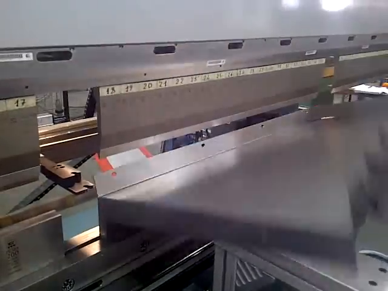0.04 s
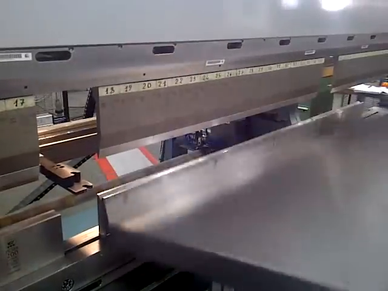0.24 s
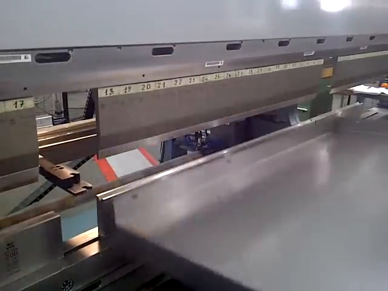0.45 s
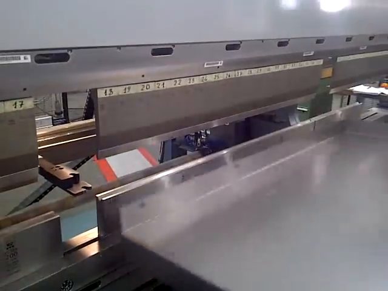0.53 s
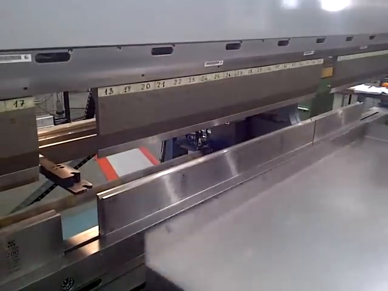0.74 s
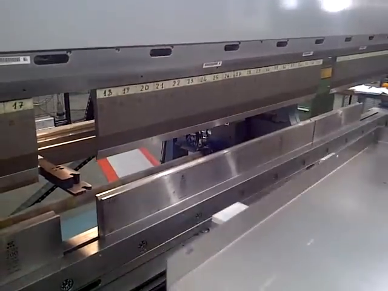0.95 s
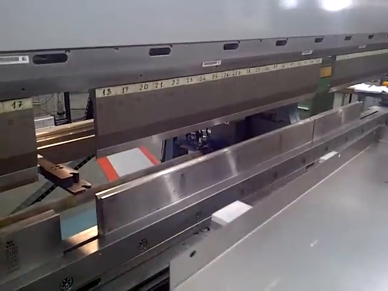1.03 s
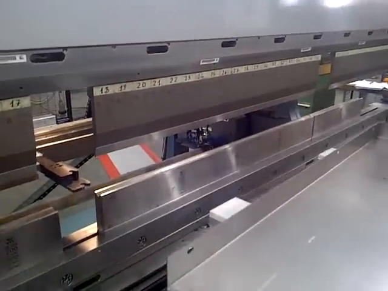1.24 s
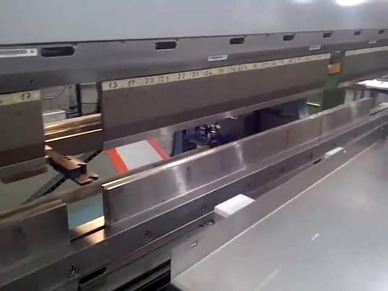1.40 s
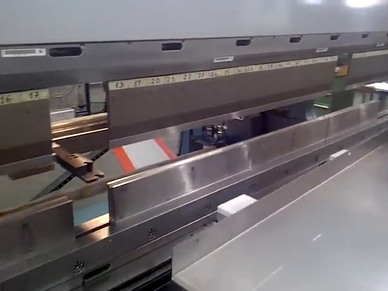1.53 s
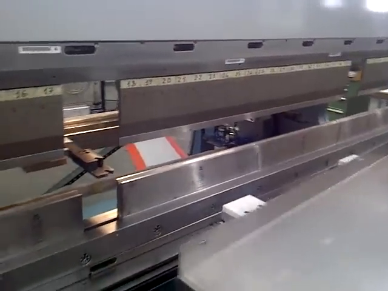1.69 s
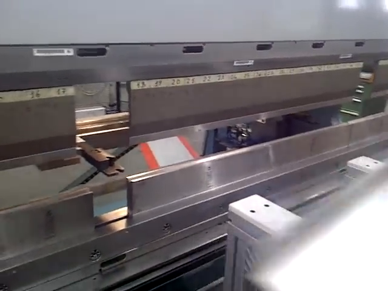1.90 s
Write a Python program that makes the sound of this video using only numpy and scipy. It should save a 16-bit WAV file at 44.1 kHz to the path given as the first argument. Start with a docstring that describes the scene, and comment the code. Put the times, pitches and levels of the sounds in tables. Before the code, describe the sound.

Loud ringing clanks and a short scrape of sheet metal, with machines humming behind.

```python
"""Steel sheet on a press brake

Close by, in a workshop hall, a bent steel sheet is slid onto the bed of a press brake: it touches,
drops twice with a clank, scrapes on and rattles against the stops, where pressing it damps the ring.
Machines hum behind it. The recorder's gain control ducks at the first heavy knock and slowly recovers."""
import sys
import numpy as np
from scipy import signal
from scipy.fft import irfft, next_fast_len
from scipy.io import wavfile
from scipy.ndimage import uniform_filter1d, minimum_filter1d

SR = 44100
rng = np.random.default_rng(int(sys.argv[2]) if len(sys.argv) > 2 else 0)


def unload_audio(sound):
    """Save the sound as a 16-bit wav file, at the path given as the first command line argument."""
    columns = np.transpose(np.atleast_2d(sound))
    # keep every value between -1 and 1, then stretch to whole-number steps
    steps = np.round(np.clip(columns, -1, 1) * 32767)
    wavfile.write(sys.argv[1], SR, steps.astype(np.int16))


N = 85995
T = np.arange(N) / SR
SIZE = next_fast_len(N)
FREQ = np.maximum(np.arange(SIZE // 2 + 1) * SR / SIZE, 1)
MIC_TOP_HZ = 8705


def undb(db):
    """Decibels to gain."""
    return 10 ** (np.asarray(db) / 20)


def unit(x):
    """Scale to rms 1."""
    return x / np.sqrt(np.mean(x ** 2))


def noise(gain):
    """Random-phase sound of rms 1 with the given gain at each frequency."""
    return unit(irfft(gain * np.exp(2j * np.pi * rng.random(len(FREQ))), SIZE)[:N])


def colour(points):
    """Gain at each frequency from (freq_hz, level_db) points."""
    hz, db = np.array(points).T
    return undb(np.interp(np.log(FREQ), np.log(hz), db))


def bell(hz, octaves):
    """A smooth band round one frequency."""
    return np.exp(-.5 * (np.log2(FREQ / hz) / octaves) ** 2)


def wander(rate_hz):
    """Smooth random drift of rms 1."""
    return noise(np.exp(-(FREQ / rate_hz) ** 2))


def strike(start, rise, hold, t60):
    """Linear attack, hold and exponential decay, all in seconds."""
    decay_s = np.maximum(T - start - rise - hold, 0)
    return np.clip((T - start) / rise, 0, 1) * undb(-60 * decay_s / t60)


def curve(points):
    """Gain over time from (time_s, level_db) points."""
    return undb(np.interp(T, *np.array(points).T))


def weak_modes(count=600, gap_hz=19):
    """The sheet's unevenly spaced weak modes, as a comb over frequency."""
    offset, strength = rng.random((count, 2)).T
    hz = (np.arange(count) + offset) * gap_hz
    comb = np.zeros(len(FREQ))
    comb[np.searchsorted(FREQ, hz)] = .5 + strength
    return comb


def workshop():
    """Fans and motors in the background: broad noise with a few wavering hum lines."""
    # spectrum of the hall's noise: freq_hz, relative_db
    spectrum = [(25, -28), (60, -16), (140, -7), (280, -1.5), (480, -2), (750, 0), (1000, -2), (1450, -0.6),
                (2200, -8), (3600, -16.5), (5200, -17.5), (6100, -17.5), (7200, -19), (9000, -23.5)]
    # machine hum lines: pitch_hz, level_db
    lines = [(48, -71.5), (94, -63.5), (299, -54), (1197, -53.5)]
    hum = sum(undb(db) * np.sqrt(2) * np.sin(2 * np.pi * hz * T + .49 * wander(2.5)) for hz, db in lines)
    return undb(-37 + 1.4 * wander(8.3)) * noise(colour(spectrum)) + hum


def scrape(comb):
    """Uneven friction on the bed drives the sheet's modes; the edge sings as it nears the stops."""
    # strength of the scrape: time_s, level_db
    slide = [(0, -33), (.06, -32), (.13, -43.5), (.2, -42), (.4, -35.5), (.47, -24), (.6, -30), (.7, -21),
             (.79, -23.5), (.86, -29.5), (.95, -51.5), (1.15, -75)]
    # spectrum of the scrape: freq_hz, relative_db
    spectrum = [(25, -32.5), (70, -11.5), (130, -19.5), (300, 3.5), (680, 0.5), (1000, -5.5), (1350, -3),
                (1850, -13.5), (2300, -26), (6500, -36), (9000, -37)]
    # swell of the singing edge: time_s, level_db
    swell = [(.62, -55), (.72, -36), (.79, -25.5), (.86, -20), (.92, -55), (1.0, -90)]
    body = unit(.66 * noise(colour(spectrum) * comb) + noise(colour(spectrum)))
    singing = curve(swell) * noise(bell(1830, octaves=.05))
    grain = undb(3.5 * wander(90))
    return (curve(slide) * body + singing) * grain


def bumps():
    """The held sheet flexes with soft, low bumps."""
    # flexes of the sheet: start_s, centre_hz, level_db
    flexes = [(0.0, 260, -35), (0.164, 89.5, -51.5), (.345, 75, -35.5), (.43, 135, -28),
              (0.836, 110, -32.5), (0.872, 325, -24), (1.57, 280, -41), (1.622, 277, -39),
              (1.695, 337, -44)]
    return sum(undb(db) * noise(bell(hz, octaves=.23)) * strike(start, rise=.006, hold=.014, t60=.17)
               for start, hz, db in flexes)


def ticks():
    """The edge touches the die with light, bright ticks."""
    # touches on the die: start_s, level_db
    touches = [(0.0214, -45.5), (0.596, -31.5), (0.644, -36), (0.6872, -26.5), (0.752, -32), (0.782, -39)]
    return sum(undb(db) * noise(bell(6100, octaves=.7)) * strike(start, rise=.002, hold=0, t60=.13)
               for start, db in touches)


def glide():
    """The edge hisses as it glides in before the first knock."""
    # swell of the hiss: time_s, level_db
    swell = [(.12, -69.5), (.17, -47), (.22, -41), (.25, -54.5)]
    end_s = swell[-1][0]
    return curve(swell) * noise(bell(5200, octaves=.55)) * (T < end_s)


def knocks(comb, pressed_s=.77, damping_db_per_s=90):
    """Each knock chatters into a short clank and leaves the sheet ringing until it is pressed home."""
    # blows on the sheet: start_s, place, clank_db, ring_db, bass_db, treble_db, rise_s, chatter_s
    blows = [(0.226, "edge", -24, -16.5, -16.5, 2.5, 0.0065, .018),
             (0.3347, "edge", -1, -3.5, 0, -5, 0.0021, 0.0055),
             (0.348, "edge", -7.5, -12.5, 10, 4.5, .002, .012),
             (0.366, "edge", -16.5, -16, -5.5, 13.5, .001, .003),
             (0.389, "edge", -17, -7, 3, -13, .002, .005),
             (0.496, "face", -2.5, -5.5, 0.5, 2.5, 0.0011, 0.0033),
             (0.526, "face", -18, -21, -7, -17, 0.00088, .007),
             (0.796, "flange", -10.5, -9.5, -4.5, 3, 0.0044, .012),
             (0.814, "flange", -9, -14, -15.5, 2.5, 0.003, .014),
             (0.8433, "flange", -13, -15, -3, 3, 0.0029, 0.01)]
    # crowded plate modes by band: centre_hz, clank_db, clank_t60_s, ring_db, free_ring_t60_s
    plate = [(70, -29.5, .2, -45, .8), (188.7, -14.5, 0.067, -26.5, 0.82), (394, -9, 0.12, -23, 1),
             (670, -4, 0.15, -15.5, 1), (1463, -6.5, .09, -13.5, 1), (2846, -19, 0.21, -19.5, .55),
             (4920, -16.5, .11, -26.5, 0.21), (6880, -14.5, 0.075, -37, 0.14)]
    # strong modes and their response by place struck: pitch_hz, free_t60_s, edge_db, face_db, flange_db
    modes = [(211, 0.19, -17, -22, -20.5), (275.7, 0.42, -25.5, -31.5, -5.5),
             (327.4, 0.93, -17.5, -6, -6.5), (365, 0.32, -11, -27.5, -17.5), (437.6, 1.1, -10.5, -10, -9),
             (587, 0.62, -6.5, -23.5, -27), (660.3, 0.42, -3.5, -19.5, -25), (705, 1.1, -16, -11.5, -7),
             (716.4, 0.59, -15, -8, -24), (775.4, 0.71, -29.5, -11, -8.5), (796, 0.25, -8, -12.5, -1.5),
             (927, 0.56, -13, -26.5, -2), (944, 1.1, -15, -19.5, -14.5), (1182, .85, -20.5, -22.5, -12.5),
             (1199, 1.7, -22.5, -12, -30), (1225, 0.73, -15.5, -21, -12), (1276, 0.97, -11.5, -18.5, -29),
             (1327, .5, -21, -19, -10), (1418, 0.31, -12, -11, -22), (1481, 0.55, -35, -13.5, -22),
             (1528, 0.51, -32.5, -18.5, -13.5), (1731, 1.3, -23.5, -19, -16.5),
             (1852, .6, -31, -20.5, -13.5), (1950, 0.23, -24, -29.5, -5.5), (2570, 0.68, -25, -21, -29),
             (2696, .4, -29.5, -26, -36), (2747, .45, -23, -18, -35), (2920, .5, -34.5, -17.5, -39),
             (3275, 0.27, -33.5, -17, -15), (4600, 0.29, -26.5, -39, -32), (4810, 0.44, -23, -39.5, -26),
             (5080, .25, -26.5, -37.5, -28), (5560, 0.11, -17.5, -33.5, -25)]
    # peaks and hollows of the sheet's radiation: freq_hz, gain_db
    radiation = [(25, -15), (70, -7), (130, -14.5), (200, 2), (450, 2), (720, -2), (930, -1), (1030, -7),
                 (1130, 1.5), (1240, 3.5), (1430, 4.5), (1620, 0), (1900, -2.5), (2300, -2.5), (2830, -2),
                 (4000, -3), (5100, 1.5), (6000, -0.5)]
    log_centres = np.log([hz for hz, *_ in plate])
    shares = [np.interp(np.log(FREQ), log_centres, row) for row in np.eye(len(plate))]
    bands = [np.sqrt(share) * colour(radiation) * (FREQ < MIC_TOP_HZ) for share in shares]
    # the shifting contact makes each strong mode waver in pitch and level
    phasors = []
    for hz, *_ in modes:
        phase = 2 * np.pi * hz * T + .48 * wander(21.8)
        phasors.append(np.exp(1j * phase) * undb(2 * wander(21.8)))
    clank, ring = np.zeros(N), np.zeros(N)
    for start, place, clank_db, ring_db, bass_db, treble_db, rise, chatter_s in blows:
        tilt_db = lambda hz: bass_db / (1 + (hz / 420) ** 2) + treble_db / (1 + (2300 / hz) ** 2)
        # the first instant of contact stands above the chatter
        impact_db = 4 * np.exp(-((T - start) / .0047) ** 4)
        chatter = undb(wander(260) + impact_db)
        for band, (hz, short_db, short_t60, long_db, long_t60) in zip(bands, plate):
            burst = chatter * strike(start, rise + .5 / hz, chatter_s, short_t60)
            clank += undb(clank_db + short_db + tilt_db(hz)) * noise(band) * burst
            decay = strike(start, rise, 0, long_t60)
            ring += undb(ring_db + long_db + tilt_db(hz)) * noise(band * comb) * decay
        column = ["edge", "face", "flange"].index(place)
        for phasor, (hz, t60, *place_db) in zip(phasors, modes):
            wave = (phasor * np.exp(2j * np.pi * rng.random())).imag
            gain = undb(.5 + ring_db + place_db[column] + tilt_db(hz))
            ring += gain * wave * strike(start, rise, 0, t60)
    pressing = undb(-damping_db_per_s * np.maximum(T - pressed_s, 0))
    # a low cut keeps the knocks free of rumble
    low_cut = signal.butter(3, 123, "high", fs=SR, output="sos")
    return signal.sosfilt(low_cut, clank + ring * pressing)


def hall(direct, echo_db=-16.5):
    """The direct sound reaches the microphone ahead of the hall's diffuse, duller echo."""
    tail = noise(colour([(100, 1), (1500, -2), (7000, -9)]))
    tail *= strike(start=.017, rise=.0067, hold=0, t60=.95)
    tail /= np.sqrt(np.sum(tail ** 2))
    return direct + undb(echo_db) * signal.fftconvolve(direct, tail)[:N]


def scene():
    """One microphone near the sheet, with the hall and its machines behind."""
    comb = weak_modes()
    sheet = knocks(comb) + scrape(comb) + glide() + ticks() + bumps()
    return (hall(sheet) + workshop())[None]


def gain_control(dry, threshold_db=-10.5, hold_s=.94, release_db_per_s=8):
    """The recorder's gain ducks at once on a loud sound, holds and creeps back."""
    power = np.abs(uniform_filter1d(dry[0] ** 2, size=700))
    over_db = np.maximum(10 * np.log10(power + 1e-12) - threshold_db, 0)
    half_hold = int(hold_s * SR) // 2
    held_db = -minimum_filter1d(-over_db, 2 * half_hold + 1, origin=half_hold, mode="constant")
    release_db = release_db_per_s * T
    cut_db = np.maximum.accumulate(held_db + release_db) - release_db
    return dry * undb(-cut_db)


def steep_lowpass(x, hz):
    """Cut sharply above one frequency."""
    return signal.sosfilt(signal.ellip(8, .2, 70, hz, fs=SR, output="sos"), x)


def record(dry, rolloff_hz=6813, ceiling=.87):
    """Microphone and recorder: gain control, a dull top end and clipping of the tallest peaks."""
    rolloff = signal.butter(10, rolloff_hz, fs=SR, output="sos")
    dull = signal.sosfilt(rolloff, gain_control(dry))
    clipped = np.clip(steep_lowpass(dull, MIC_TOP_HZ), -ceiling, ceiling)
    return steep_lowpass(clipped, hz=15978)


dry = scene()
out = record(dry)
unload_audio(out)
```